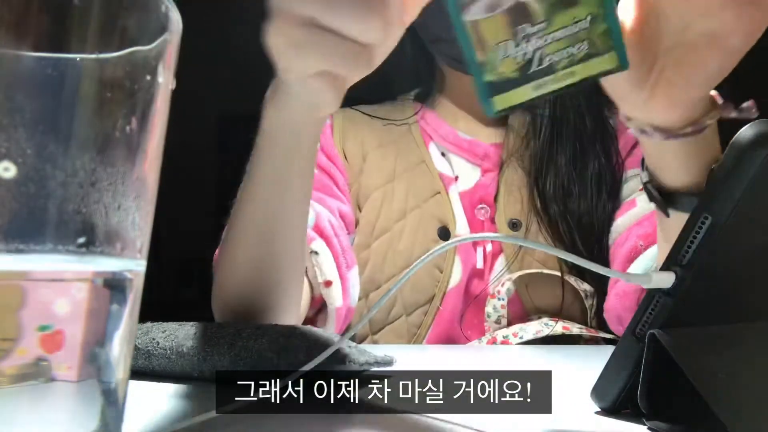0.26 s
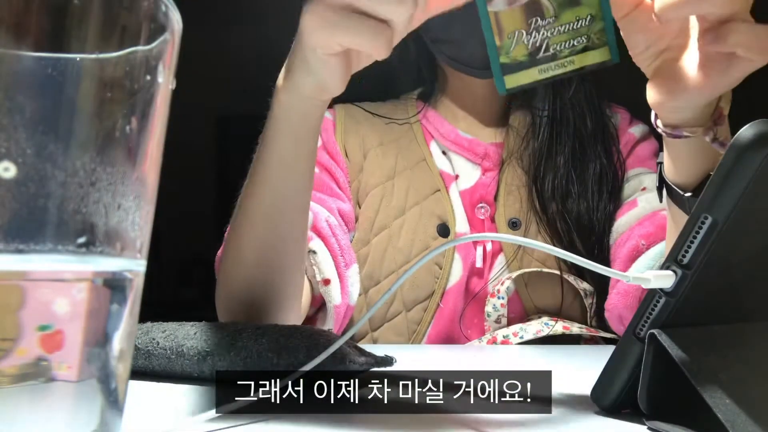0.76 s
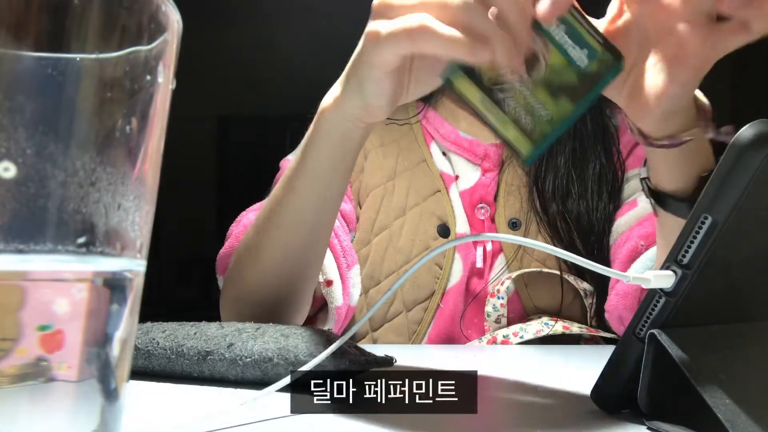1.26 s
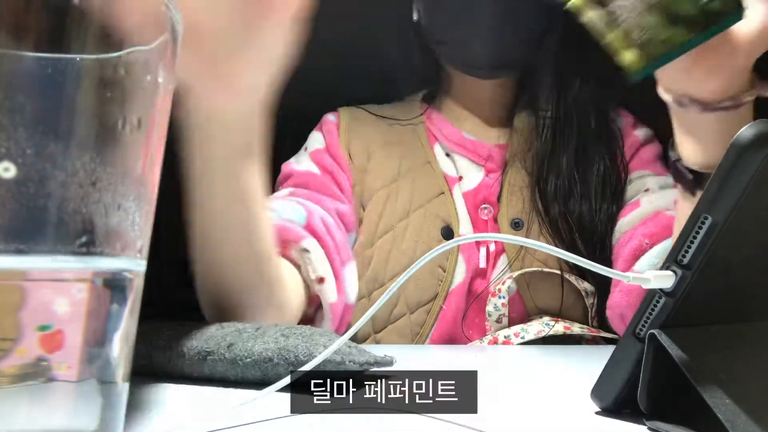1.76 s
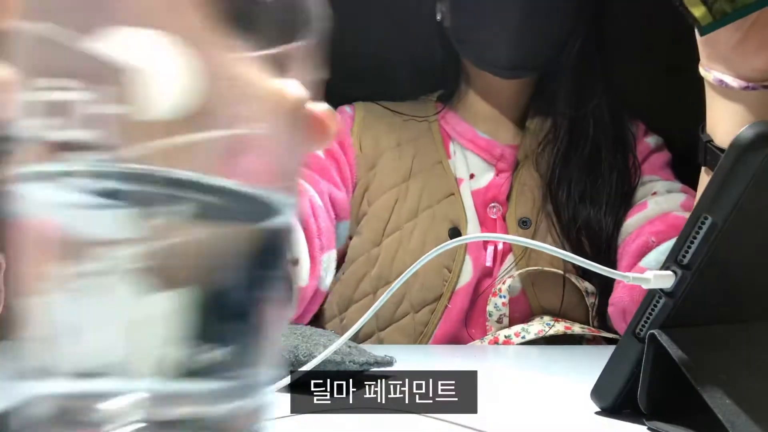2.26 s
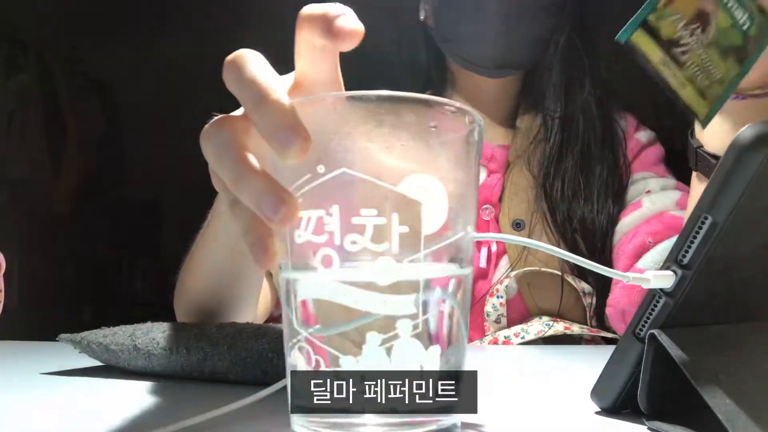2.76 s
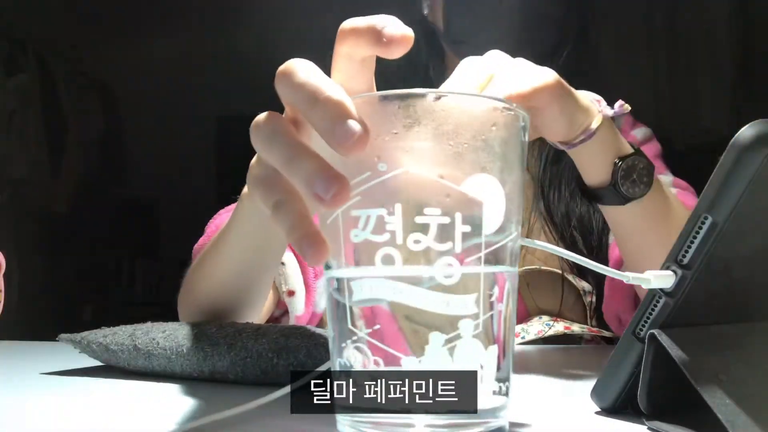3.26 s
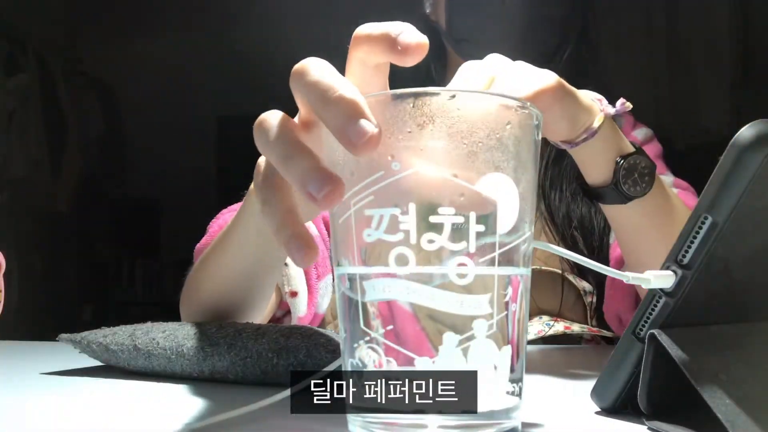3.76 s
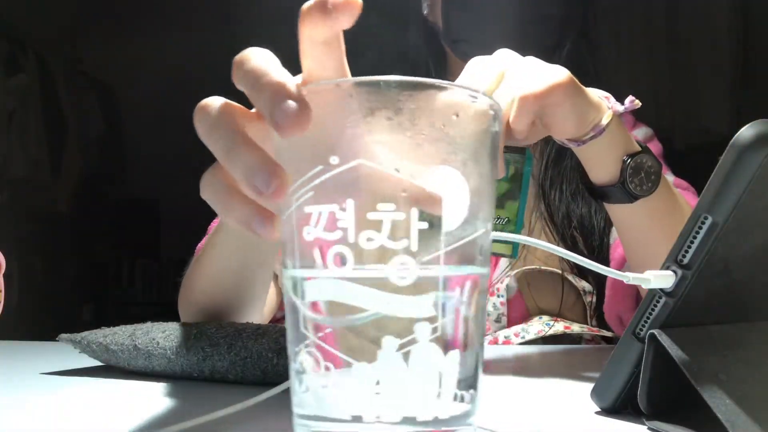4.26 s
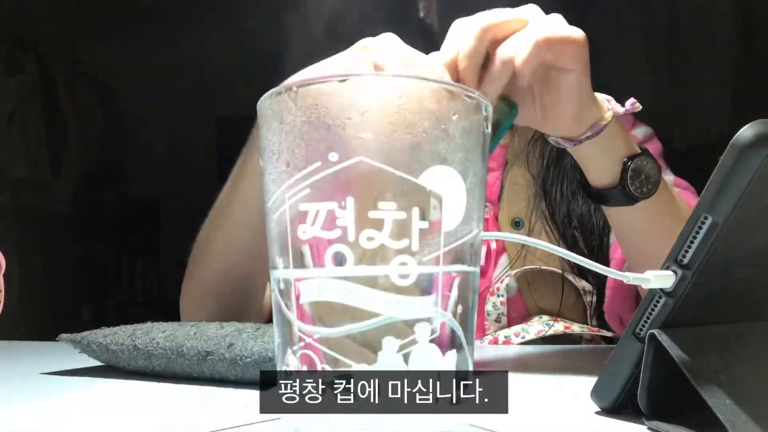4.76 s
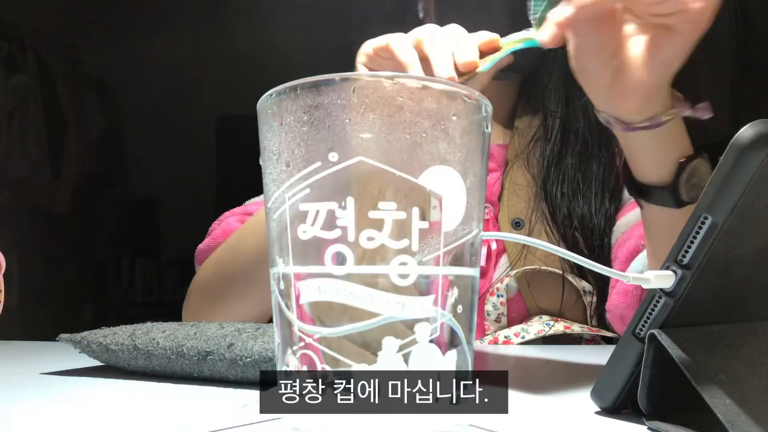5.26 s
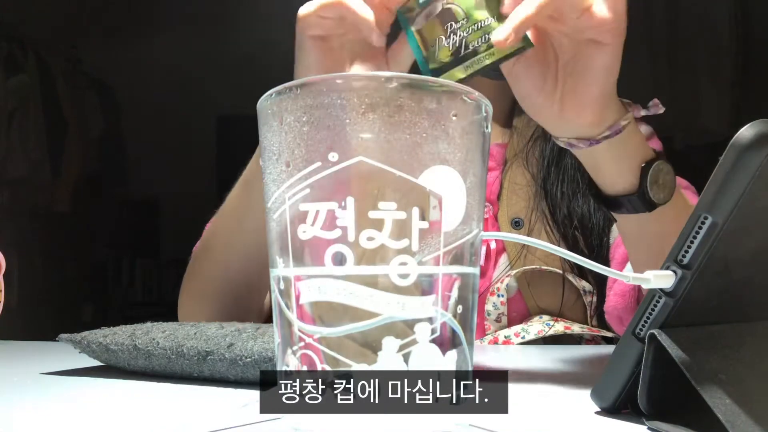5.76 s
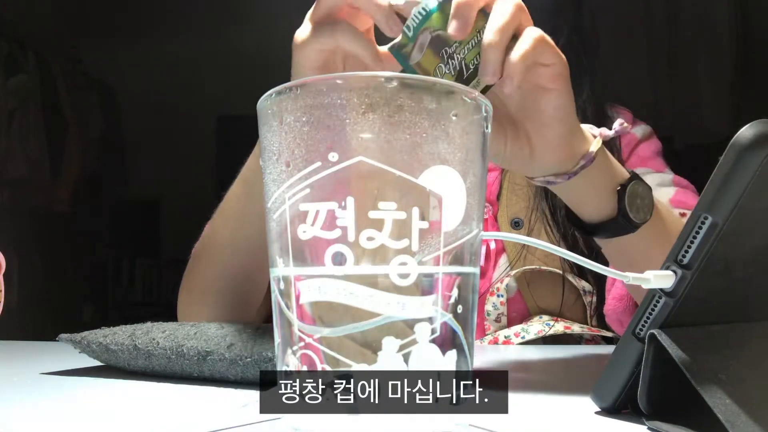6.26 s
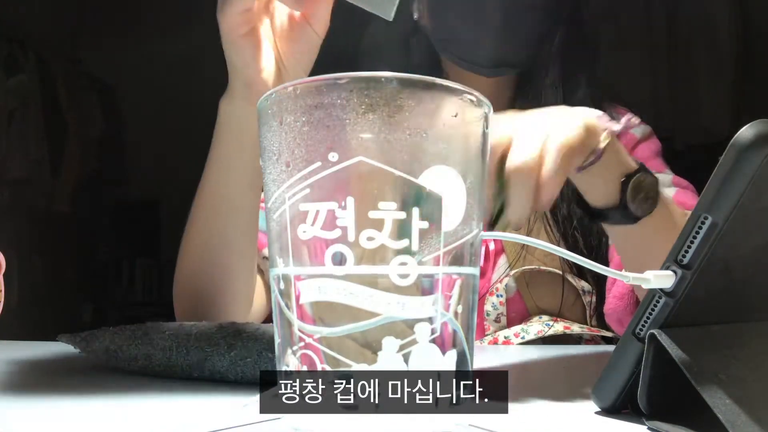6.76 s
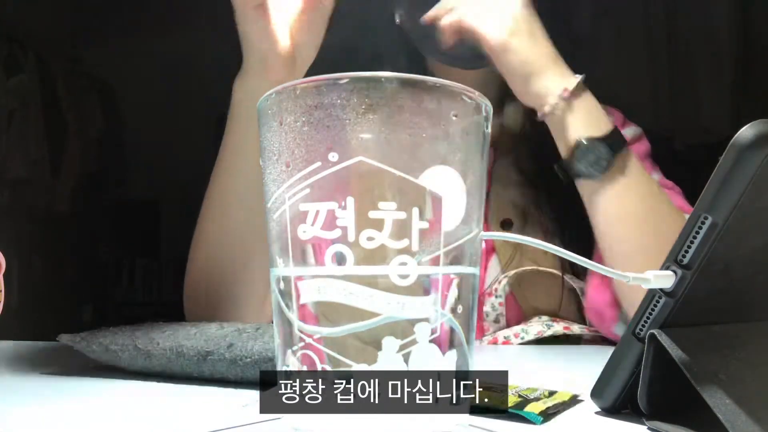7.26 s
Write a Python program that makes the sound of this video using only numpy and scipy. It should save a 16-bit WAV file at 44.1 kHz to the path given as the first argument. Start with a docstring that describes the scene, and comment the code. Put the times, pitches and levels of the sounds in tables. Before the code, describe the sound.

A foil tea sachet crinkles softly, a glass knocks loudly onto a table and slides, then the sachet is ripped open and rustled.

```python
"""A soft bump, then a foil tea sachet crinkles close by in a small quiet room, one crease at a time.
A glass of water is lifted, set down with a knock, rocks and is slid along, making the table ring.
The sachet is ripped open in two pulls and a last tug, each a fizz of tiny breaks in the foil.
Fingers rustle over it as it is spread and emptied, and it drops on the table with a few light pats."""
import sys
import numpy as np
from scipy import signal
from scipy.fft import rfft, irfft, next_fast_len
from scipy.io import wavfile
from scipy.ndimage import uniform_filter1d, map_coordinates

SR = 44100
rng = np.random.default_rng(int(sys.argv[2]) if len(sys.argv) > 2 else 0)


def unload_audio(sound):
    """Save the sound as a 16-bit wav file, at the path given as the first command line argument."""
    columns = np.transpose(np.atleast_2d(sound))
    # keep every value between -1 and 1, then stretch to whole-number steps
    steps = np.round(np.clip(columns, -1, 1) * 32767)
    wavfile.write(sys.argv[1], SR, steps.astype(np.int16))


N = 330750

# Creases flipping over; a facet is the flat patch of foil beside a crease:
# (time [s], level [dB], facet pitch [Hz], boost below 2 kHz [dB])
CREASE_SNAPS = [(0.3208, -51.5, 4150, -12), (0.3375, -56, 4700, 2), (0.3729, -38.5, 6120, 1),
                (0.3802, -46, 3160, 13), (0.3842, -47, 3750, 20.5), (0.793, -54, 2280, 16),
                (0.854, -53, 3420, 15.5), (1.0663, -46.5, 6000, -7), (1.1094, -45, 3940, -10),
                (1.218, -47.5, 4130, 3), (1.2274, -40.5, 9480, -6), (1.257, -43.5, 2270, 6),
                (1.325, -48, 6000, 10), (1.3588, -46, 3400, 2), (1.45, -56.5, 5500, 7),
                (1.4588, -49, 6070, 0), (1.4714, -45.5, 3820, 14), (1.476, -45.5, 4300, 4),
                (1.4934, -49.5, 5450, -17), (1.516, -51, 5000, -16), (1.543, -52.5, 6800, -12),
                (1.6026, -47, 4270, 8.5), (1.6092, -50, 6870, -7), (1.661, -59, 3280, 10),
                (2.7807, -59.5, 5940, -3), (4.5904, -46.5, 4270, 10.5), (4.7562, -45.5, 3680, 3),
                (4.775, -38, 6140, 2.5), (4.7995, -47, 4200, 0), (4.8129, -43, 5700, 4.5),
                (4.822, -48, 5840, -13), (4.8277, -41, 6600, -13), (4.8355, -46, 6960, 0),
                (4.843, -36.5, 4660, 4), (4.8863, -45, 6150, -1), (4.972, -46, 11400, -23),
                (5.0325, -36.5, 13570, -19), (5.0624, -42, 13260, 3), (5.104, -48, 12440, 8),
                (5.2155, -52, 3400, 1), (5.4169, -42.5, 5280, 4.5), (5.5367, -44.5, 6370, -3.5),
                (5.5479, -49.5, 6500, 12), (5.667, -54.5, 2870, 7), (5.7188, -40.5, 6500, 10.5),
                (5.743, -56.5, 4400, 20), (5.878, -44.5, 3850, 4), (5.9402, -54, 4920, 7),
                (6.1168, -51.5, 4650, 4.5), (6.156, -41, 4510, 1.5), (6.1862, -49.5, 4830, 13),
                (6.2058, -52, 4800, 12), (6.4388, -40.5, 4540, -1.5), (6.6004, -50, 6200, -6),
                (7.0553, -44.5, 10550, -4), (7.0864, -49, 3890, -2)]
# Pulls that run the tear on: (time [s], length [s], level [dB], sheet level above the fizz [dB])
TEAR_PULLS = [(4.847, .006, -47, 3), (4.977, 0.059, -45, -1.5), (5.127, 0.012, -58, 0.5)]
# Fingers stroking the foil: (time [s], length [s], level [dB])
FINGER_STROKES = [(1.464, 0.051, -59.5), (5.255, 0.032, -67), (5.44, 0.094, -63), (5.72, 0.24, -69),
                  (6.16, 0.087, -62), (6.35, 0.098, -69), (6.55, 0.049, -63), (6.934, 0.018, -61.5)]
# The empty sachet landing on edge and toppling: (time [s], level [dB])
SACHET_PATS = [(6.983, -57.5), (7.0244, -47), (7.056, -45), (7.086, -44), (7.092, -50), (7.111, -60)]
# The glass meeting the table: (time [s], level [dB], treble cut-off [Hz])
GLASS_KNOCKS = [(2.044, -35.5, 540), (2.058, -39, 557), (2.094, -34.5, 544), (2.4371, -31, 600),
                (2.4424, -10, 8040), (2.457, -28.5, 1190), (2.4752, -24, 1290), (2.548, -21.5, 1210),
                (2.563, -29, 560), (2.581, -38, 600)]
# Pushes of the glass along the table: (time [s], length [s], level [dB])
GLASS_PUSHES = [(2.09, 0.014, -55.5), (2.585, 0.053, -58), (2.918, 0.076, -51), (3.228, 0.045, -62),
                (4.075, 0.14, -50)]
# Hands and elbows meeting the table: (time [s], level [dB])
ARM_BUMPS = [(0.163, -44.5), (1.216, -47), (1.455, -45.5), (2.002, -44), (2.703, -45), (2.739, -53.5)]
# Modes, the tones the table rings at with the glass on it: (pitch [Hz], width [Hz], level [dB])
TABLE_MODES = [(124, 30, -10.5), (152.7, 26, -5.5), (206, 24, -8), (252, 79, -6), (390, 82, -1.5),
               (436, 26, 2), (491.5, 31, 2), (610, 41, -8), (785, 65, -5.5), (897, 42, -10.5),
               (1050, 150, -13), (1220, 110, -9.5), (1540, 110, -18.5), (1760, 79, -24), (2010, 163, -14),
               (2750, 160, -24), (3430, 30, -36), (4700, 400, -32.5)]
# How long the room's echo takes to fall by 60 dB: (frequency [Hz], time [s])
ROOM_DECAY = [(120, 0.51), (450, 0.82), (2000, 0.22), (6000, 0.11), (14000, 0.28)]

# Colours, or how strong each sound is from bass to treble: (frequency [Hz], level [dB])
CRACK_COLOUR = [(80, -29.5), (600, -2.5), (1300, -2), (2100, 4), (3100, -1), (4400, 4.5), (5500, -6.5),
                (6400, 1.5), (7500, -6), (10000, -3), (15500, -5)]  # a crease cracking
SHEET_COLOUR = [(60, -26), (240, -6), (420, -17), (720, -0.5), (950, -5.5), (1700, -6.5), (2200, -3),
                (3300, -9.5), (4200, 0), (5500, -6.5), (6300, -3.5), (7100, -21), (9000, 1.5),
                (12000, -20.5)]  # the sheet shaken by the tear
FIZZ_COLOUR = [(3000, -54), (7000, -28.5), (8300, 8), (9600, -1.5), (12000, 4.5), (14600, 5.5),
               (15800, -11)]  # the tearing edge
RUB_COLOUR = [(400, -9), (1200, -3), (2050, 2.5), (3100, -9), (4500, -0.5), (5500, -11), (5900, 5.5),
              (7200, -15.5), (8000, 1.5), (9400, -14.5), (13200, -3), (15800, -13)]  # rubbed foil
PAT_COLOUR = [(60, -22), (250, -1), (520, -3), (780, -1.5), (1050, -7.5), (1350, -1.5), (1900, -16),
              (3100, -20), (3800, -12.5), (5500, -30), (15000, -24)]  # the sachet landing
GRIT_COLOUR = [(80, -27), (400, -9), (1200, -3), (3000, -11.5), (5000, -22), (6200, -37), (15000, -41.5)]  # crunch under the glass
SCRAPE_COLOUR = [(60, -10), (115, -3.5), (160, -3), (260, 5.5), (400, -1.5), (520, 2), (800, -2.5),
                 (1100, -3), (1500, -5), (2050, -1.5), (2800, -2.5), (3700, 6), (4650, -4), (6000, 16),
                 (9000, 12.5)]  # friction under the glass
HUSH_COLOUR = [(15, -44.5), (25, -56), (80, -7), (123, -0.5), (285, -3.5), (317, -3.5), (427, -3),
               (545, -3), (641, -3), (714, -3.5), (962, -8), (1190, -6.5), (1400, -9.5), (11900, -26),
               (16000, -26.5)]  # the quiet room


def crinkles():
    """Each crease buckles in an instant and briefly rings a cluster of tones in the facet beside it."""
    out, t = np.zeros(N), np.arange(2048) / SR
    buckle = np.minimum(t / .0014, 1) ** 2
    typical_hz, peak_db, peak_octaves = 4460, 4.5, 0.2
    for s, db, facet_hz, body_db in CREASE_SNAPS:
        sheen_db = 7 * np.log2(facet_hz / typical_hz)  # smaller, higher facets are brighter
        tilt = [(2000, body_db), (4200, 0), (7000, 0), (11500, sheen_db)]
        pitch_peak = lambda hz: peak_db / (1 + (np.log2((hz + 1) / facet_hz) / peak_octaves) ** 2)
        noise = burst(t, t60=0.0088, ring_db=-19, ring_t60=0.052)
        crack = coloured(noise, lambda hz: along(CRACK_COLOUR, hz) + along(tilt, hz) + pitch_peak(hz))
        tones_hz = facet_hz * np.exp(.13 * rng.standard_normal((6, 1)))
        facet = np.sin(2 * np.pi * (tones_hz * t + rng.random((6, 1)))).sum(0) * fade(t, .009)
        add(out, s, amp(db) * unit_attack(buckle * (unit(crack) + 0.5 * unit(facet))))
    return out


def rip():
    """Thousands of breaks a second, coming in clumps, fizz at the tearing edge and shake the sheet."""
    coarse = grains(per_s=350, spread_db=2)
    fine = grains(per_s=3500, spread_db=4)
    breaks = (fine + .6 * coarse) * flutter(per_s=170, depth_db=1.5)
    pulls = [(s, length, db) for s, length, db, _ in TEAR_PULLS]
    shakes = [(s, length, db + shake_db) for s, length, db, shake_db in TEAR_PULLS]
    slopes = dict(rise_db_per_s=620, fall_db_per_s=307)
    edge = envelope(pulls, **slopes) * shaped(breaks, FIZZ_COLOUR)
    sheet = envelope(shakes, **slopes) * shaped(breaks, SHEET_COLOUR)
    return edge + sheet


def rubbing():
    """Fingers and the tea bag brush the foil in clumps of tiny slips; small creases tick under them."""
    clumps = flutter(per_s=90, depth_db=5)
    brush = shaped(grains(per_s=2400, spread_db=2) * clumps, RUB_COLOUR)
    creases = grains(per_s=75, spread_db=4)
    tick = burst(np.arange(512) / SR, t60=0.0041, ring_db=-19, ring_t60=.025)
    ticks = shaped(signal.fftconvolve(creases, tick)[:N], CRACK_COLOUR)
    return envelope(FINGER_STROKES, rise_db_per_s=400, fall_db_per_s=353) * (brush + amp(-7) * ticks)


def landing():
    """The light, hollow sachet pats the table."""
    out, t = np.zeros(N), np.arange(4096) / SR
    for s, db in SACHET_PATS:
        pat = shaped(burst(t, t60=0.028, ring_db=-26, ring_t60=0.039), PAT_COLOUR)
        add(out, s, amp(db) * unit_attack(pat))
    return out


def flexing(x, depth_db=3.2):
    """As the foil bends, the tones it favours drift, so its colour keeps changing."""
    spectra = signal.stft(x, nperseg=512)[2]
    drift = uniform_filter1d(rng.standard_normal(spectra.shape), size=5, axis=0)  # smooth over pitch
    drift = uniform_filter1d(drift, size=7, axis=1)  # and over time
    bent = signal.istft(spectra * amp(depth_db * np.clip(unit(drift), -2, 2)), nperseg=512)[1][:N]
    return unit(bent) * x.std()


def knocks():
    """The glass scuffs off the table, lands and rocks; softer knocks are duller, their grit less so."""
    out, ring = np.zeros(N), table_ring()
    t = np.arange(len(ring)) / SR
    for s, db, cut_hz in GLASS_KNOCKS:
        # The rim touches a new spot each time, making each mode a little louder or softer.
        spot = [(hz, 2 * rng.standard_normal()) for hz, _, _ in TABLE_MODES]
        body = coloured(ring, lambda hz: along(spot, hz))
        grit = shaped(burst(t, t60=0.0054, ring_db=-1, ring_t60=0.057), GRIT_COLOUR)
        soften = lambda x, slope: coloured(x, lambda hz: -10 * np.log10(1 + (hz / cut_hz) ** slope))
        add(out, s, amp(db) * (soften(body, slope=5.2) + amp(-42) * soften(grit, slope=1.1)))
    return out


def sliding():
    """The base of the glass sticks and slips, shaking the table and, faintly, its own wall."""
    friction = grains(per_s=600, spread_db=6.5) + 0.61 * rng.standard_normal(N)
    slips = unit(friction * flutter(per_s=87, depth_db=0.6))
    table = coloured(table_ring(), lambda hz: along(SCRAPE_COLOUR, hz))
    t = np.arange(len(table)) / SR
    wall_hz, wall_db = 3420, -33
    wall = np.sin(2 * np.pi * wall_hz * t) * fade(t, t60=0.16)
    ring = unit(table) + amp(wall_db) * unit(wall)
    push = envelope(GLASS_PUSHES, rise_db_per_s=371, fall_db_per_s=269)
    return signal.fftconvolve(push * slips, ring / np.linalg.norm(ring))[:N]


def table_ring():
    """The table rings after one blow; its bending waves carry the treble ahead of the bass."""
    power = lambda hz: sum(amp(db) ** 2 / (1 + 2 * ((hz - pitch) / width) ** 2) ** 2
                           for pitch, width, db in TABLE_MODES)
    ring = coloured(signal.unit_impulse(SR // 2), lambda hz: 10 * np.log10(power(hz) + amp(-63) ** 2))
    travel_s, at_hz = 0.001606, 400  # travel time of a wave at this pitch
    phase_lag = 4 * np.pi * travel_s * np.sqrt(at_hz * np.fft.rfftfreq(SR // 2, 1 / SR))
    ring = irfft(rfft(ring) * np.exp(-1j * phase_lag))[:SR // 3]
    return ring / np.abs(ring).max()


def bumps():
    """Soft hands and elbows give only a low thud that dies quickly."""
    out, t = np.zeros(N), np.arange(SR // 4) / SR
    tones = sum(amp(db) * np.sin(2 * np.pi * hz * t) for hz, db in [(95, 3), (135, 2.5), (215, -3)])
    thud = tones * fade(t, t60=0.057) * (1 - np.exp(-t / 0.005))
    for s, db in ARM_BUMPS:
        add(out, s, amp(db) * thud)
    return out


def room(x, wet_db):
    """Adds the small room's echo, whose treble dies first; wet_db sets how loud it is."""
    hz, t, spectra = signal.stft(rng.standard_normal(SR // 2), SR, nperseg=256)
    tail = signal.istft(spectra * fade(t, along(ROOM_DECAY, hz)[:, None]), SR, nperseg=256)[1]
    delayed = np.pad(x, (SR // 150, 0))
    return x + amp(wet_db) * signal.fftconvolve(delayed, tail / np.linalg.norm(tail))[:N]


def hush():
    """The faint, steady noise of the room."""
    return amp(-65.5) * shaped(rng.standard_normal(N), HUSH_COLOUR)


def grains(per_s, spread_db):
    """Tiny slips or breaks at random moments and of uneven size."""
    sizes = amp(spread_db * np.clip(rng.standard_normal(N), -2, 2)) * rng.choice([-1, 1], N)
    return unit(sizes * (rng.random(N) < per_s / SR))


def burst(t, t60, ring_db, ring_t60):
    """A sharp crack of noise with a weaker, longer tail."""
    return rng.standard_normal(len(t)) * (fade(t, t60) + amp(ring_db) * fade(t, ring_t60))


def flutter(per_s, depth_db):
    """A gain that glides to a new random value per_s times a second."""
    targets = rng.standard_normal(int(N * per_s / SR) + 4)
    return amp(depth_db * map_coordinates(targets, [np.arange(N) * per_s / SR], order=1))


def envelope(strokes, rise_db_per_s, fall_db_per_s):
    """A gain that swells, holds and dies away for each stroke (time [s], length [s], level [dB])."""
    t = np.arange(N) / SR
    return sum(amp(db - rise_db_per_s * np.maximum(s - t, 0)
                   - fall_db_per_s * np.maximum(t - s - length, 0)) for s, length, db in strokes)


def coloured(x, gain_db):
    """Turns each frequency of x up or down by gain_db(hz)."""
    size = 2 * next_fast_len(len(x))
    cepstrum = irfft(np.log(amp(gain_db(np.fft.rfftfreq(size, 1 / SR)))), size)
    # Folding onto the first half makes the filter ring after a hit, never before it.
    cepstrum[1:size // 2] *= 2
    cepstrum[size // 2 + 1:] = 0
    return irfft(rfft(x, size) * np.exp(rfft(cepstrum)), size)[:len(x)]


def shaped(x, colour):
    """Filters x with a colour table and scales it to strength 1."""
    return unit(coloured(x, lambda hz: along(colour, hz)))


def along(points, hz):
    """Reads between the (frequency [Hz], value) points, with octaves evenly spaced."""
    points_hz, values = np.transpose(points)
    return np.interp(np.log(hz + 1), np.log(points_hz), values)


def fade(t, t60):
    """A decay of 60 dB in t60 seconds."""
    return np.exp(-np.log(1000) * t / t60)


def amp(db):
    """Turns decibels into a gain to multiply by."""
    return 10 ** (np.asarray(db) / 20)


def unit(x):
    """Scales x to an average strength (rms) of 1."""
    return x / np.sqrt(np.mean(x ** 2) + 1e-20)


def unit_attack(x, attack_s=.004):
    """Scales x so that its opening crack has strength 1."""
    return x / np.sqrt(np.mean(x[:round(attack_s * SR)] ** 2))


def add(track, s, sound):
    """Mixes a sound in at s seconds."""
    part = track[round(s * SR):][:len(sound)]
    part += sound[:len(part)]


def scene():
    """Sachet and glass over the room's hush; knocks, slides and bumps have their deep bass cut away."""
    sachet = room(flexing(crinkles() + rip() + rubbing() + landing()), wet_db=-17.5)
    bass_cut = lambda hz: along([(25, -10), (55, -31), (95, 1.5)], hz)
    table = coloured(knocks() + sliding() + bumps(), bass_cut)
    return (sachet + hush() + room(table, wet_db=-32.5))[None]


def record(dry):
    """Cuts away the very highest treble."""
    top_hz = 15900
    return irfft(rfft(dry) * (np.fft.rfftfreq(N, 1 / SR) < top_hz), N)


dry = scene()
out = record(dry)
unload_audio(out)
```